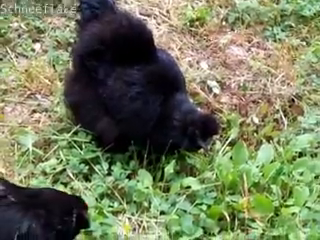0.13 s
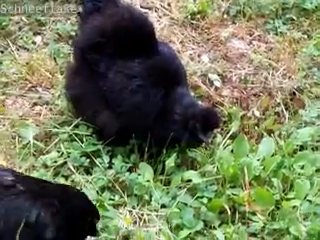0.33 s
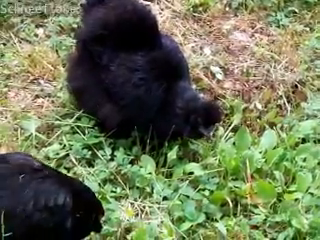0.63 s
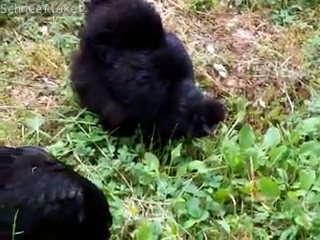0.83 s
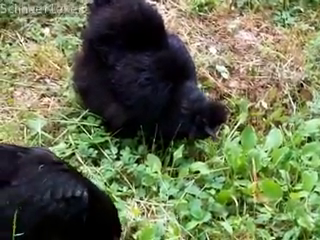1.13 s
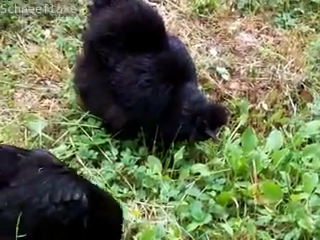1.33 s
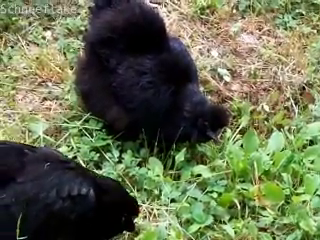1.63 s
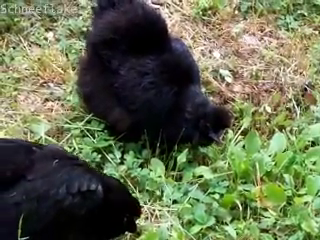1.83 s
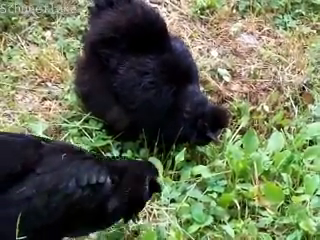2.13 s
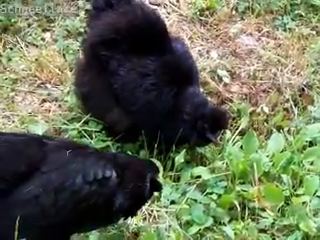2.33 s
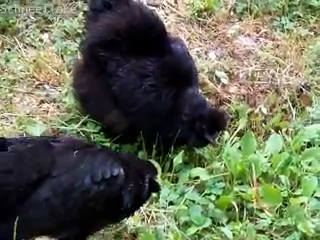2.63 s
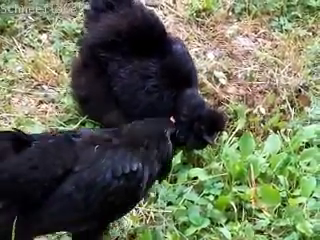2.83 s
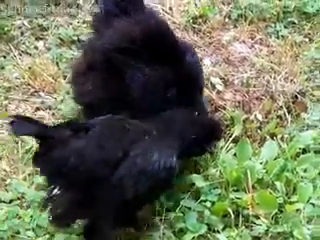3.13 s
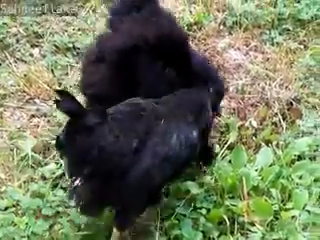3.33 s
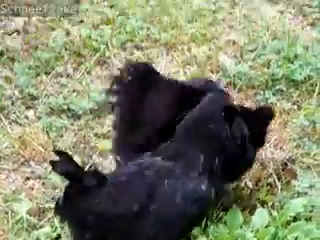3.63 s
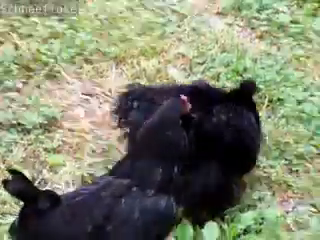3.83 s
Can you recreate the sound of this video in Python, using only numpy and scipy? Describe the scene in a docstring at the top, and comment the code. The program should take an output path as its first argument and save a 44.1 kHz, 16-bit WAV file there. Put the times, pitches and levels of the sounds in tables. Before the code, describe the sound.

Hens clucking softly in a grassy yard, then one trills and gives a harsh squawk.

```python
"""A grassy yard, with hens feeding close by over a quiet outdoor hush. One murmurs soft low clucks
through a shut beak. Another breaks into a rattling, growling trill with higher and lower tones, opens
her beak in a harsh squawk that cracks into a rasp, and trails off in a fast warble, one note swinging
up and down in pitch. Beaks peck, blades snap and a foot thuds in short bursts of noise; feathers and
grass rustle and swish."""
import sys
import numpy as np
from scipy import signal
from scipy.fft import rfft, irfft
from scipy.io import wavfile
from scipy.ndimage import uniform_filter1d

SR = 44100
rng = np.random.default_rng(int(sys.argv[2]) if len(sys.argv) > 2 else 0)


def dump(signal):
    """Clip the signal to [-1, 1] and save it as 16-bit WAV at the path in sys.argv[1]."""
    limited = np.clip(np.atleast_2d(signal).T, -1, 1)
    pcm = np.round(limited * 32767).astype(np.int16)
    wavfile.write(sys.argv[1], SR, pcm)


N = 176400
T = np.arange(N) / SR

# Tone of the outdoor bed. Each row: frequency in Hz, gain in dB.
HUSH_EQ = [(15, -42), (25, -13.5), (187, -2.5), (317, -4.5), (606, -0.5), (1220, -6), (3100, -22),
           (4030, -36), (7700, -26), (10000, -58), (16900, -120)]
# Fader ride of the feather and grass rustle. Each row: time in seconds, level in dB.
RUSTLE_RIDE = [(2.6, -67), (3.05, -64), (3.13, -56.5), (3.3, -55), (3.62, -64), (3.92, -64), (3.955, -49.5),
               (4, -60)]
# Tone of the rustle. Each row: frequency in Hz, gain in dB.
RUSTLE_EQ = [(100, -5.5), (1300, 9), (2500, -2), (4200, -18), (5500, -5.5), (7800, -6.5)]

# Soft clucks. Each row: start and length in seconds, level in dB, opening and closing pitch in Hz.
CLUCK_NOTES = [(-.005, 0.056, -48.5, 277.3, 257), (0.091, 0.058, -54.5, 284, 243),
               (0.155, 0.05, -56.5, 256.5, 262), (0.193, 0.071, -55, 281.7, 251.6),
               (0.339, 0.013, -48, 252, 242), (0.372, 0.036, -46, 275, 232), (0.543, 0.052, -59, 258, 240),
               (0.621, 0.042, -51, 268, 270), (1.623, 0.029, -40, 269, 275),
               (1.75, 0.062, -47, 270.2, 246.6), (1.846, 0.09, -52, 264.6, 252),
               (1.952, 0.065, -56, 247.7, 262), (2.018, 0.087, -52.5, 264.7, 268),
               (2.251, 0.092, -50.5, 281.3, 267.4), (2.346, 0.083, -54, 272.5, 261),
               (2.43, 0.094, -54, 273, 274.5), (2.505, 0.097, -55.5, 267.2, 269.5),
               (3.854, 0.0076, -50, 286, 266), (3.871, 0.0076, -50, 286, 262)]
# The throat with the beak shut. Each row: frequency in Hz, gain in dB.
SHUT_BEAK_EQ = [(260, -5), (520, -7), (800, 2), (1060, -10), (1350, -39), (3500, -51)]
# One falling coo. Each row: time in seconds, pitch in Hz, level in dB.
COO_CONTOUR = [(2.654, 372.5, -62), (2.662, 343, -52.5), (2.677, 277, -53.5), (2.70, 287, -52.5),
               (2.717, 263, -58), (2.728, 256, -69)]
# The coo's dark tone. Each row: frequency in Hz, gain in dB.
COO_EQ = [(290, -7.5), (750, -17), (3000, -49)]

# Beaks hit the ground, grass blades snap, a foot lands. Each row: start in seconds, peak in dB.
PECK_HITS = [(.148, -37), (.452, -44), (3.117, -33), (3.955, -41)]
SNAP_HITS = [(.3965, -40), (1.0001, -43.5), (1.1812, -48), (1.5614, -47), (1.9051, -44), (3.6955, -45)]
STEP_HITS = [(3.126, -33.5)]
# Tone of a hard peck, crisp grass and a dull step. Each row: frequency in Hz, gain in dB.
PECK_EQ = [(100, -18), (1000, 13.5), (2000, -3.5), (3000, -13.5), (4200, -33), (7800, -20)]
GRASS_EQ = [(500, -20), (2000, -33), (3400, 8), (4200, -32), (5500, 4), (7800, 7.5)]
STEP_EQ = [(90, -45), (380, -0.5), (900, -5), (2500, -39)]

# Trill bursts. Each row: first and last beat in seconds, beats per second, pitch swing as a fraction,
# roughness from 0 to 1, hoarseness in dB relative to the upper tone.
TRILL_BURSTS = [(1.823, 1.889, 61, .1, .35, -19), (2.739, 2.906, 66, .1, .14, -20),
                (2.923, 3.022, 60.5, .17, .26, -29), (3.038, 3.179, 64, .17, .26, -28),
                (3.525, 3.607, 62.5, .2, .38, -20)]
# The trill's tones. Each row: time in seconds, upper pitch in Hz, upper and lower level in dB.
TRILL_CONTOUR = [(1.823, 922, -43, -46), (1.84, 864, -40.5, -61), (1.862, 903, -53, -86),
                 (1.889, 930, -46, -46.5), (2.739, 926, -42.5, -65), (2.79, 929, -40, -54),
                 (2.906, 924, -38, -68), (2.925, 923, -37, -35.5), (2.98, 915, -43.5, -40),
                 (3.125, 890, -35, -39.5), (3.18, 931, -40.5, -34), (3.53, 870.4, -42, -40.5),
                 (3.607, 776, -45.5, -57)]
# Resonance of the hoarse air in the trill. Each row: frequency in Hz, gain in dB.
HOARSE_EQ = [(900, -30), (1600, -9.5), (1920, 1.5), (2200, -1.5), (2800, -23)]
TONE_JITTER = 0.029  # fraction of the pitch

# The squawk's clear cry. Each row: time in seconds, pitch in Hz, fundamental and octave level in dB.
CRY_CONTOUR = [(3.178, 943.5, -33, -70), (3.186, 989, -31, -62), (3.191, 887, -36, -33.5),
               (3.197, 991, -21.5, -34.5), (3.203, 1143, -38.5, -38), (3.21, 938, -34, -62),
               (3.219, 1018, -17.5, -36), (3.227, 1166, -35, -38), (3.234, 1176, -25.5, -44),
               (3.242, 1145, -49, -31.5), (3.256, 1142, -30.5, -34), (3.27, 1137, -39.5, -30),
               (3.276, 1128, -28.5, -39), (3.283, 1028, -22.5, -29), (3.292, 1008, -35, -70),
               (3.302, 954, -25.5, -54), (3.311, 1104, -44, -44), (3.34, 1413, -49, -58),
               (3.348, 1310, -22, -53), (3.358, 1446, -39, -55)]
# The cry's edge. Each entry, from the third harmonic up: level in dB relative to the octave.
CRY_HARMONICS = [-19.5, -34, -34, -35, -28]
# The voice cracks into a rasp. Each row: time in seconds, pulse rate in Hz, level in dB.
RASP_CONTOUR = [(3.18, 257.7, -46), (3.195, 271.6, -28), (3.222, 258.5, -43.5), (3.28, 262.6, -55.5),
                (3.292, 264.6, -25.5), (3.305, 257.2, -26), (3.322, 260.6, -28), (3.338, 259.4, -27),
                (3.348, 250, -48)]
# The throat with the beak open. Each row: frequency in Hz, gain in dB.
OPEN_BEAK_EQ = [(250, -60), (520, -47), (760, 3.5), (1060, -2), (1320, -7.5), (1600, 3), (1900, -14),
                (2250, -12.5), (2750, -26), (3550, -19), (4200, -42.5), (5100, -25), (6000, -42)]
# A lower tone pushes through the rasp. Each row: time in seconds, level in dB.
LOWER_TONE_RIDE = [(3.297, -42), (3.305, -23), (3.314, -40), (3.329, -40), (3.338, -24), (3.346, -42)]
# The squawk's warbling tail. Each row: time in seconds, bottom and top pitch in Hz, pre-EQ level in dB.
WARBLE_CONTOUR = [(3.357, 1060, 1400, -33.5), (3.381, 1000, 1370, -24.5), (3.396, 980, 1500, -41.5),
                  (3.412, 1260, 1950, -32), (3.43, 990, 1980, -30.5), (3.446, 1010, 1850, -32.5),
                  (3.461, 1150, 1900, -32.5), (3.477, 1330, 1900, -39), (3.491, 930, 1350, -28.5),
                  (3.516, 1000, 1250, -42)]
# The throat during the warble. Each row: frequency in Hz, gain in dB.
WARBLE_EQ = [(1150, 0), (1400, -7.5), (1700, -19), (2100, -17.5), (2900, -30), (3750, -18), (4300, -42)]

# Feathers brush through grass. Each row: midpoint and length in seconds, level in dB.
SWISH_SWELLS = [(3.821, 0.092, -59), (3.958, 0.077, -57.5)]
# Roll-off of the mirrored treble. Each row: frequency in Hz, gain in dB.
MIRROR_EQ = [(8300, -2.5), (10000, -8), (12700, -21.5), (15000, -46.5)]


def amp(db):
    return 10 ** (np.asarray(db) / 20)


def unit_rms(x):
    return x / np.sqrt(np.mean(x ** 2) + 1e-20)


def eq_gain(eq, hz):
    """Linear gain of an EQ curve at the given frequencies."""
    points_hz, db = np.transpose(eq)
    return amp(np.interp(np.log(hz + 1), np.log(points_hz), db))


def equalize(x, eq):
    return irfft(rfft(x) * eq_gain(eq, np.fft.rfftfreq(len(x), 1 / SR)), len(x))


def noise(eq):
    return unit_rms(equalize(rng.standard_normal(N), eq))


def curves(rows):
    """Each column after the time as an automation curve, held at both ends."""
    times, *columns = np.transpose(rows)
    return [np.interp(T, np.sort(times), column) for column in columns]


def during(rows):
    """A soft-edged gate, open from the first row to the last."""
    return uniform_filter1d(1. * ((T > rows[0][0]) & (T < rows[-1][0])), size=200)


def place(mix, start_s, sound):
    at = round(start_s * SR)
    sound = sound[max(-at, 0):]
    part = mix[max(at, 0):][:len(sound)]
    part += sound[:len(part)]


def drift(hz):
    """Smooth random modulation at unit RMS, rolling off around hz."""
    roll_off = np.exp(-(np.fft.rfftfreq(N, 1 / SR) / hz) ** 2)
    return unit_rms(irfft(rfft(rng.standard_normal(N)) * roll_off, N))


def phase_of(hz):
    return 2 * np.pi * np.cumsum(hz) / SR


def voice(hz, throat, bass_db=0, harmonics=12):
    """Harmonics of a pitch curve shaped by the throat, at unit level."""
    phase = phase_of(hz)
    gains = [eq_gain(throat, k * hz) * amp(bass_db * (k == 1)) for k in range(1, harmonics + 1)]
    wave = sum(gain * np.cos(k * phase + k * k) for k, gain in enumerate(gains, 1))
    return wave / np.sqrt(sum(gain ** 2 for gain in gains) / 2)


def hush():
    """A quiet outdoor bed whose lows and highs waver separately."""
    level_db, crossover_hz = -61.5, 270
    air = noise(HUSH_EQ)
    bass = signal.sosfiltfilt(signal.butter(2, crossover_hz, fs=SR, output="sos"), air)
    highs = (air - bass) * amp(1.73 * drift(hz=7.5))
    lows = bass * unit_rms(amp(1.5 * drift(hz=14)))
    return amp(level_db) * (highs + lows)


def rustle():
    """Tiny crackles, faint at first, that swell as the hens step and brush against each other."""
    grains_per_s = 2700
    grains = (rng.random(N) < grains_per_s / SR) * rng.standard_normal(N)
    accent_db = np.minimum(rng.exponential(1, N), 4)
    return amp(curves(RUSTLE_RIDE)[0]) * unit_rms(equalize(grains * amp(accent_db), RUSTLE_EQ))


def clucks():
    """Short shut-beak notes with a slight arch of pitch, and one falling coo."""
    attack_s, release_s, arch = 0.0091, 0.022, 0.0077
    out, wobble = np.zeros(N), 1 + 0.0188 * drift(hz=98)
    mean_db = np.mean([row[2] for row in CLUCK_NOTES])
    for start, length, db, from_hz, to_hz in CLUCK_NOTES:
        t = np.arange(0, length, 1 / SR)
        progress = t / length
        hz = from_hz + (to_hz - from_hz) * progress
        hz *= 1 + arch * (np.sin(np.pi * progress) - .5)
        hz *= np.interp(start + t, T, wobble)
        envelope = np.minimum(t / attack_s, 1) * np.minimum((length - t) / release_s, 1)
        bass_db = -0.5 * (db - mean_db)  # louder clucks have less fundamental
        place(out, start, amp(db) * envelope / envelope.max() * voice(hz, SHUT_BEAK_EQ, bass_db))
    coo_hz, coo_db = curves(COO_CONTOUR)
    return out + during(COO_CONTOUR) * amp(coo_db) * voice(coo_hz * wobble, COO_EQ, harmonics=6)


def impacts(hits, eq, decay_s):
    """Pecks, snapping blades or a footfall: each a dry burst of noise that dies fast."""
    out, t = np.zeros(N), np.arange(SR // 16) / SR
    for start, peak_db in hits:
        burst = rng.standard_normal(len(t)) * np.exp(-t / decay_s)
        burst = equalize(np.pad(burst, (len(t), 0)), eq)  # padding leaves room for the EQ's pre-ring
        place(out, start - len(t) / SR, amp(peak_db) * burst / abs(burst).max())
    return out


def trills():
    """Higher and lower tones rattle and growl in quick, uneven beats, each opening on a hoarse octave."""
    lower_hz, wander_depth, accent_spread_db, sharpness = 728, .024, 1.9, 1.4
    out = np.zeros(N)
    upper_hz, upper_db, lower_db = curves(TRILL_CONTOUR)
    upper_jitter, lower_jitter = 1 + TONE_JITTER * drift(hz=324), 1 + TONE_JITTER * drift(hz=200)
    flutter, timing_wobble = drift(hz=450), drift(hz=30)
    upper_pitch = upper_hz * upper_jitter * (1 + wander_depth * drift(hz=31))
    lower_pitch = lower_hz * lower_jitter * (1 + wander_depth * drift(hz=17))
    air = noise(HOARSE_EQ)
    for first, last, rate, swing, rough, hoarse_db in TRILL_BURSTS:
        beat = (T - first) * rate + .5 + .25 * rough * timing_wobble
        on = (beat > 0) & (beat < round((last - first) * rate) + 1)
        offset = beat[on] % 1 - .5  # zero at mid-beat
        accents = amp(accent_spread_db * rng.standard_normal(64))
        strength = accents[beat[on].astype(int)] * (1 + rough * flutter[on])
        gate = abs(np.cos(np.pi * offset)) ** sharpness
        bend = 1 + swing * (2 * offset) ** 2  # the pitch dips within each beat
        upper_phase = phase_of(upper_pitch[on] * bend)
        lower_phase = phase_of(lower_pitch[on] * np.sqrt(bend))
        upper = gate * amp(upper_db[on]) * np.sin(upper_phase)
        lower = np.sqrt(gate) * amp(lower_db[on]) * np.sin(lower_phase)
        octave = (1 - 2 * offset) * np.sin(2 * upper_phase)
        hoarse = amp(upper_db[on] + hoarse_db) * np.sqrt(gate) * (.5 * air[on] + octave)
        out[on] += np.sqrt(2) * strength * (upper + lower) + hoarse
    return out


def cry():
    """A high open-beak note shifts its weight between fundamental and octave; its overtones flutter."""
    jitter, flutter_hz = 0.014, 600
    hz, fundamental_db, octave_db = curves(CRY_CONTOUR)
    phase = phase_of(hz * (1 + jitter * drift(hz=378)))
    overtones = (1 + .11 * drift(flutter_hz)) * np.sin(2 * phase)
    for k, db in enumerate(CRY_HARMONICS, 3):
        overtones += amp(db) * (np.sin(k * phase) + .5 * drift(flutter_hz) * np.cos(k * phase))
    note = amp(fundamental_db) * np.sin(phase) + amp(octave_db) * overtones
    return during(CRY_CONTOUR) * np.sqrt(2) * note


def rasp():
    """Uneven low pulses and puffs of air through the open throat, around a solid lower tone."""
    jitter, breath_mix, lower_hz = .055, .42, 751
    hz, db = curves(RASP_CONTOUR)
    hz = hz * (1 + jitter * drift(hz=194.8))
    puffs = rng.standard_normal(N) * (1 + np.cos(phase_of(hz)))
    breath = unit_rms(equalize(puffs, OPEN_BEAK_EQ))
    grit = unit_rms(voice(hz, OPEN_BEAK_EQ, harmonics=28) + breath_mix * breath)
    lower_phase = phase_of(lower_hz * (1 + TONE_JITTER * drift(hz=193)))
    lower = np.sqrt(2) * amp(curves(LOWER_TONE_RIDE)[0]) * np.sin(lower_phase)
    return during(RASP_CONTOUR) * amp(db) * grit + during(LOWER_TONE_RIDE) * lower


def warble():
    """One swinging note throbs as it dips into the throat's resonance; its octave glints at the top."""
    swings_per_s, dip_at_s, jitter = 62.7, 3.381, .03
    dwell, overtone_db, breath_db = 1.8, -8, -16.5  # dwell above 1 lingers on the bottom pitch
    bottom_hz, top_hz, db = curves(WARBLE_CONTOUR)
    swing = abs(np.sin(np.pi * swings_per_s * (T - dip_at_s))) ** (2 * dwell)
    hz = (bottom_hz + (top_hz - bottom_hz) * swing) * (1 + jitter * drift(hz=380))
    phase = phase_of(hz)
    note = sum(eq_gain(WARBLE_EQ, k * hz) * amp(overtone_db * (k > 1)) * np.sin(k * phase)
               for k in range(1, 4))
    breath = amp(breath_db) * noise(OPEN_BEAK_EQ)
    return during(WARBLE_CONTOUR) * amp(db) * (np.sqrt(2) * note + breath)


def swishes():
    """Soft bright swells as feathers slide over grass blades."""
    swell = sum(amp(db) * np.cos(np.pi * np.clip((T - middle) / length, -.5, .5))
                for middle, length, db in SWISH_SWELLS)
    return swell * noise(GRASS_EQ)


def yard_scatter(dry):
    """A faint, short reverb scattered back from the surroundings."""
    wet_db, t60_s, predelay_s = -17, .25, .004
    t = np.arange(SR // 2) / SR
    tail = rng.standard_normal(len(t)) * amp(-60 * t / t60_s) * (t > predelay_s)
    return amp(wet_db) * signal.fftconvolve(dry, tail / np.linalg.norm(tail))[:N]


def scene():
    """Calls and impacts with a touch of yard reverb, over dry rustle, swishes and hush, in mono."""
    pecks = impacts(PECK_HITS, PECK_EQ, decay_s=0.0033)
    snaps = impacts(SNAP_HITS, GRASS_EQ, decay_s=0.0022)
    step = impacts(STEP_HITS, STEP_EQ, decay_s=0.011)
    hens = clucks() + pecks + snaps + step + trills() + cry() + rasp() + warble()
    return (hens + yard_scatter(hens) + rustle() + swishes() + hush())[None]


def record(dry):
    """A narrow-band recorder leaks a mirror image of its band into the treble; a high cut follows."""
    def low_pass(x, hz):
        return signal.oaconvolve(x, signal.firwin(1023, hz, window=("kaiser", 8), fs=SR), "same")
    recorder_rate_hz = 16000
    band = low_pass(dry[0], hz=7800)
    image = equalize(2 * band * np.cos(2 * np.pi * recorder_rate_hz * T), MIRROR_EQ)
    return low_pass(band + image, hz=15500)[None]


dry = scene()
out = record(dry)
dump(out)
```